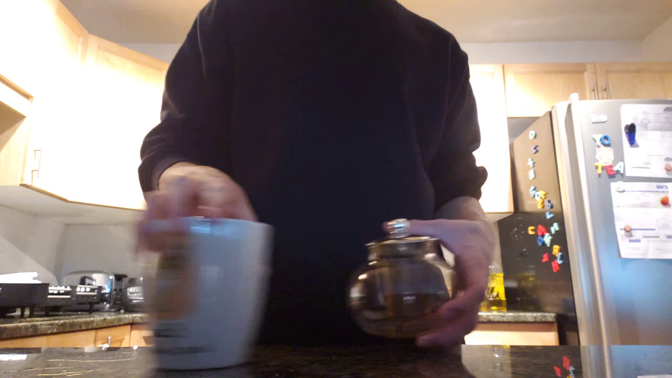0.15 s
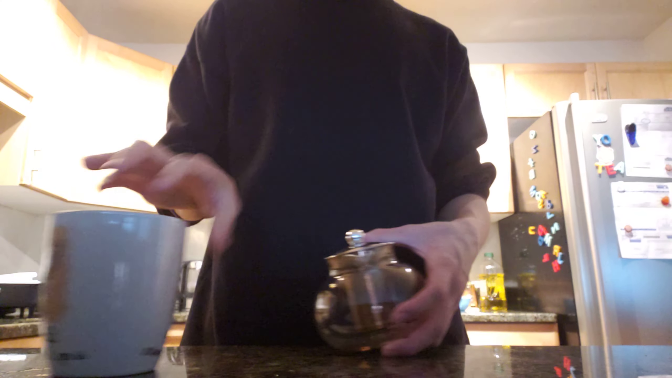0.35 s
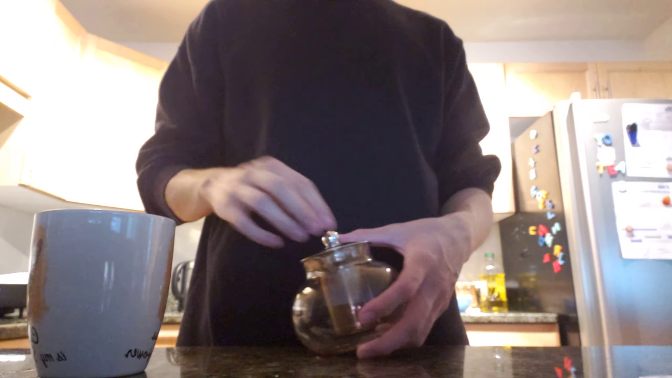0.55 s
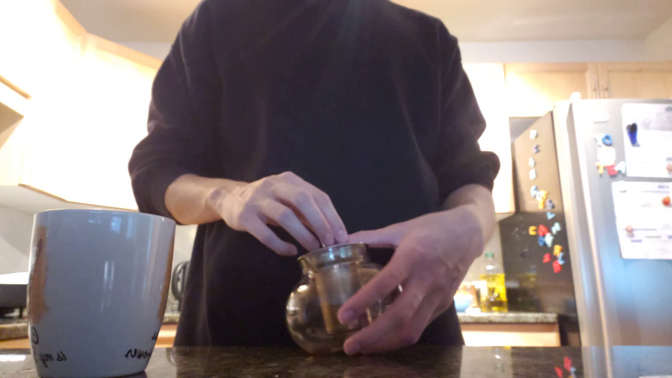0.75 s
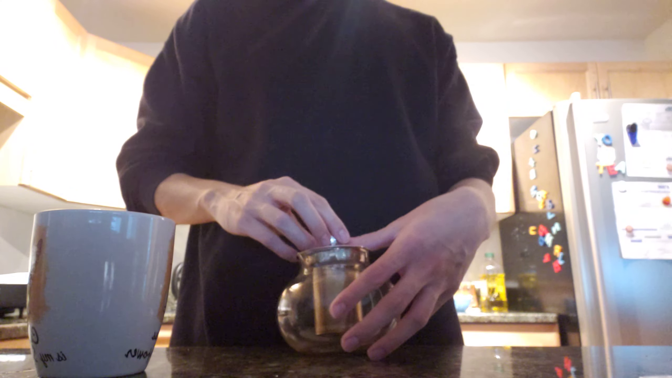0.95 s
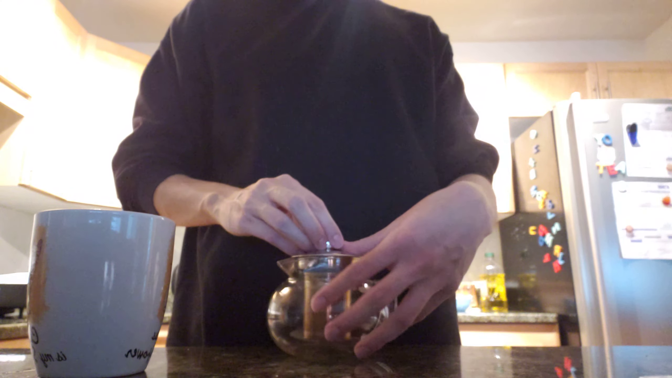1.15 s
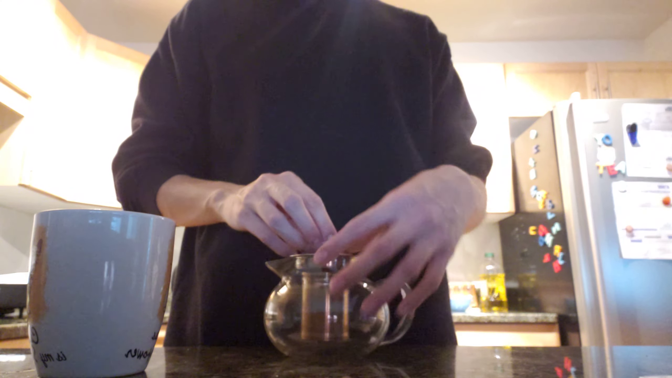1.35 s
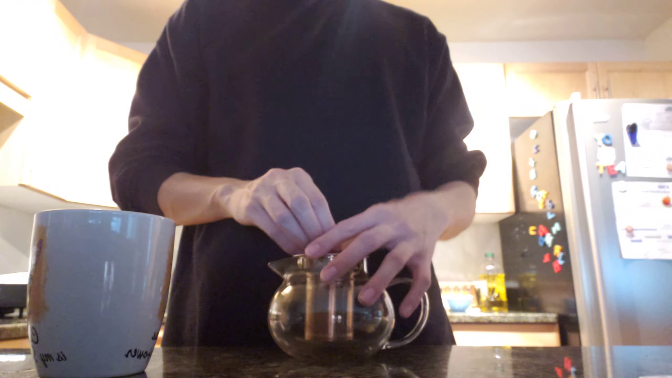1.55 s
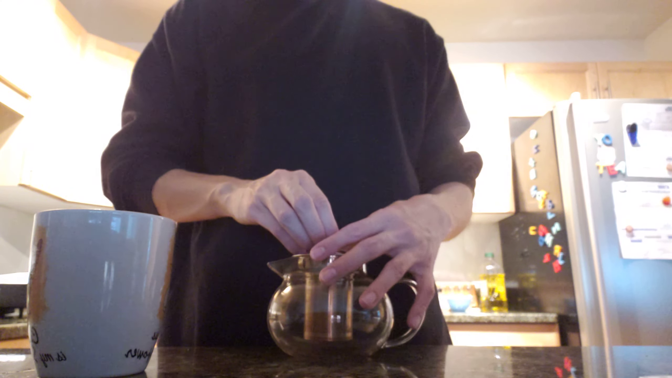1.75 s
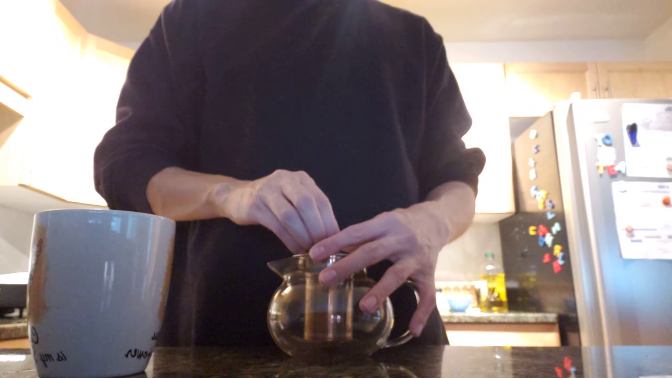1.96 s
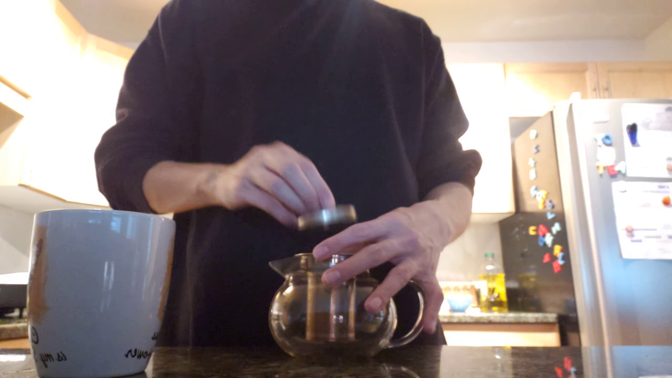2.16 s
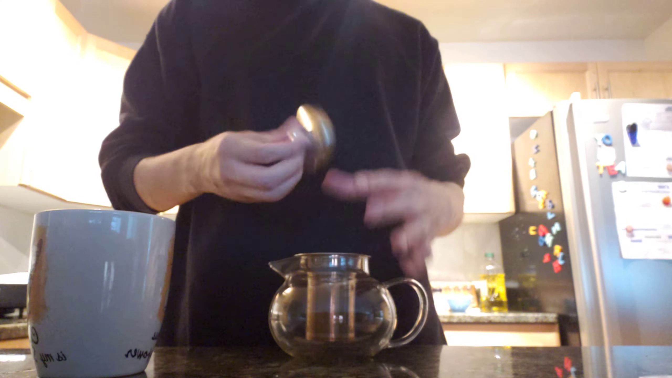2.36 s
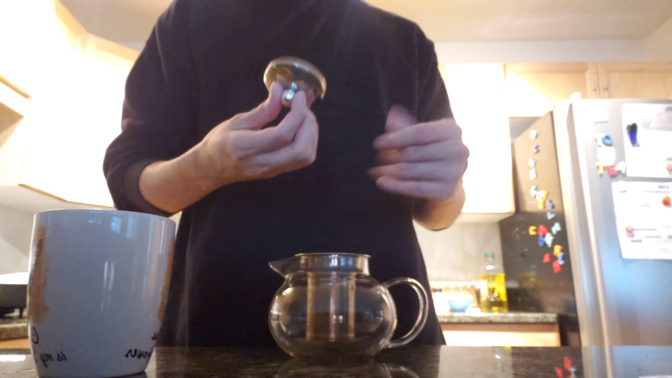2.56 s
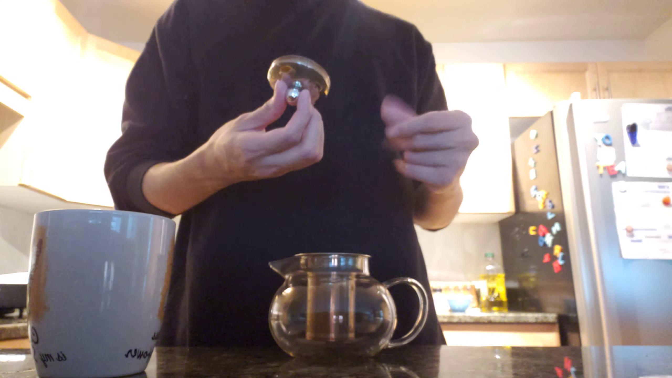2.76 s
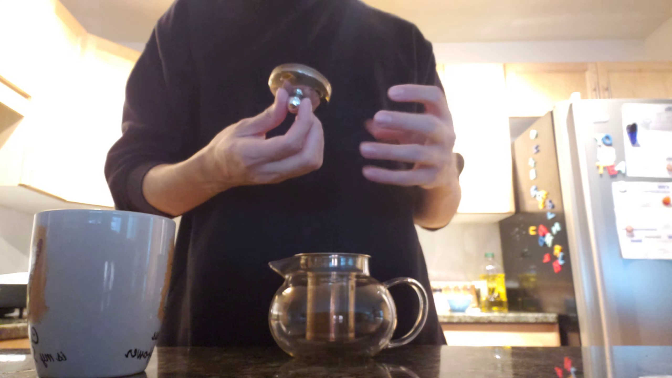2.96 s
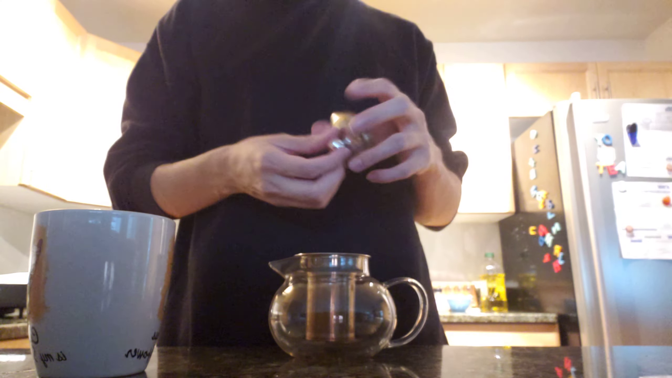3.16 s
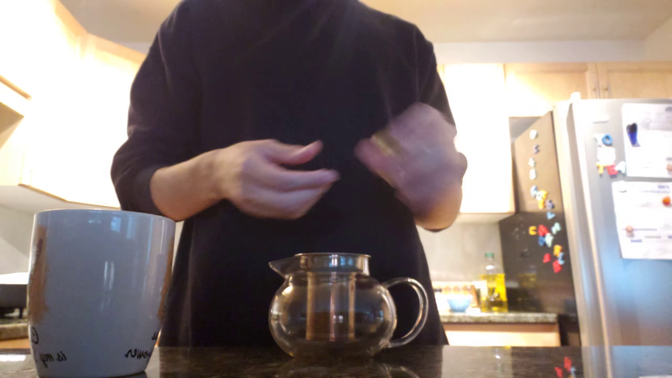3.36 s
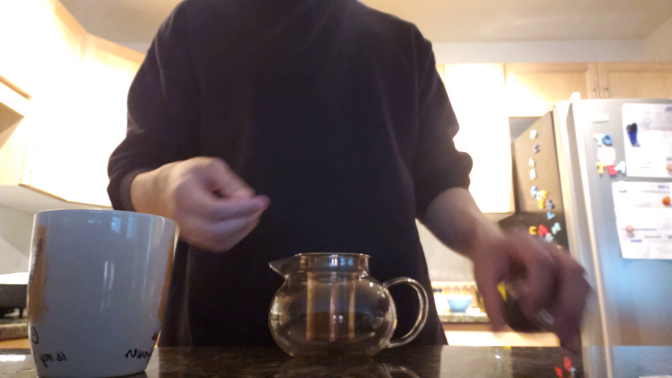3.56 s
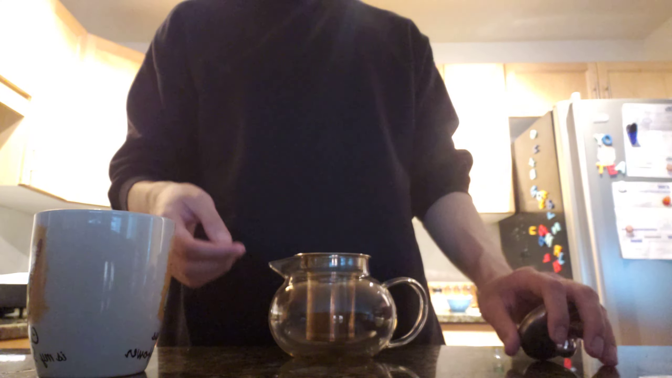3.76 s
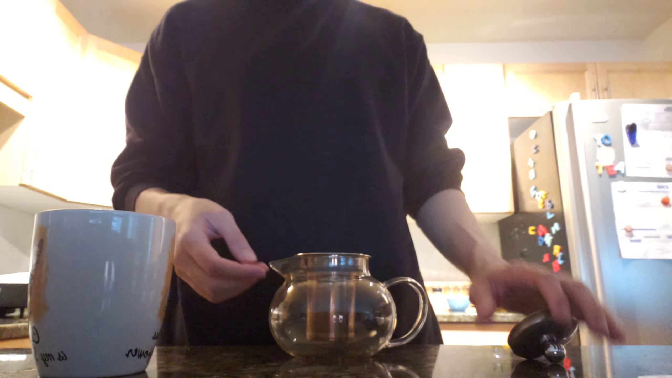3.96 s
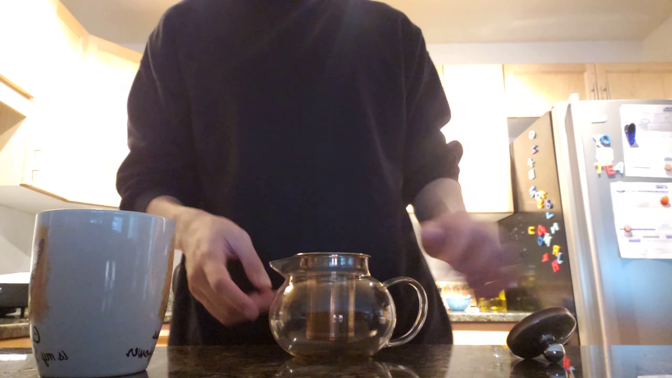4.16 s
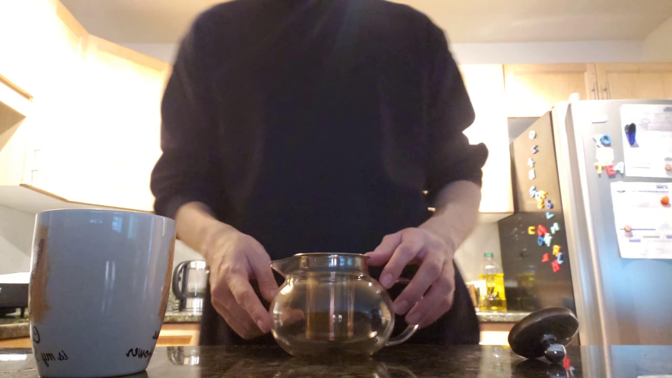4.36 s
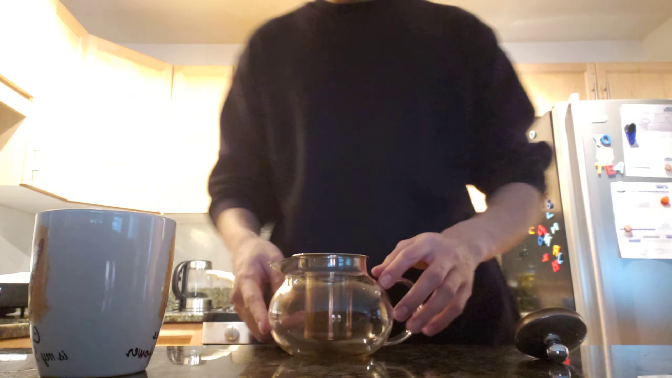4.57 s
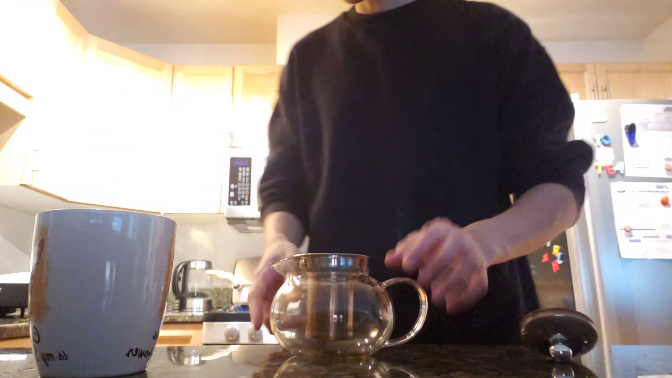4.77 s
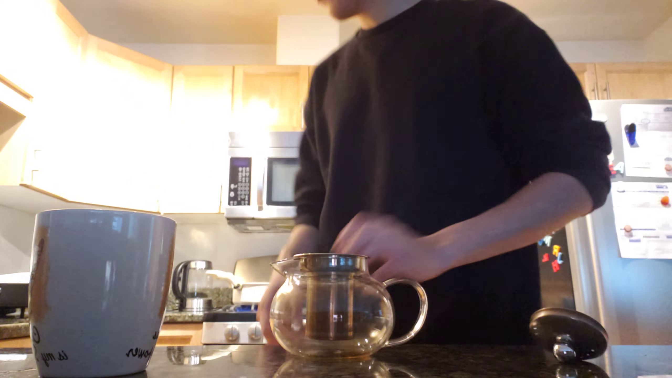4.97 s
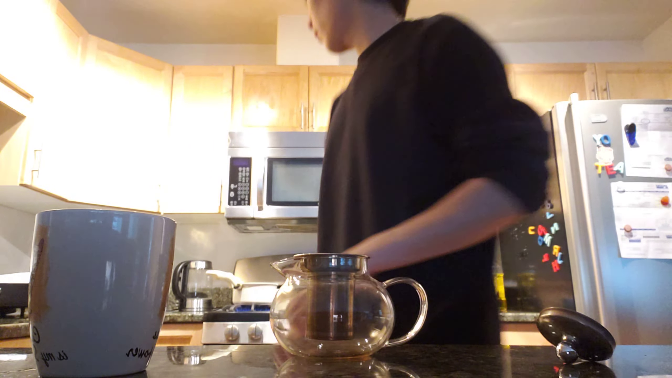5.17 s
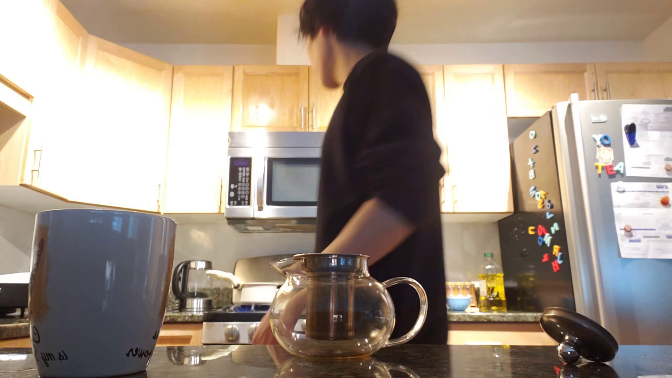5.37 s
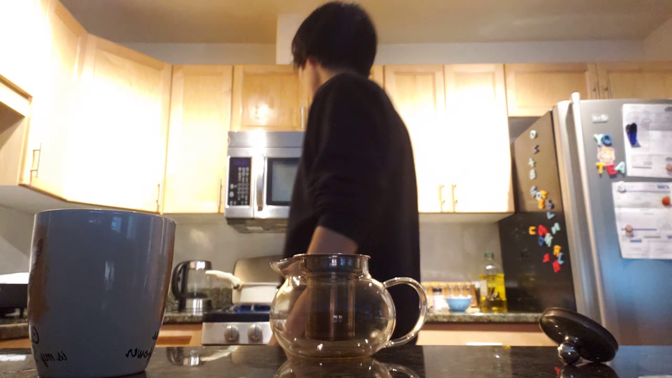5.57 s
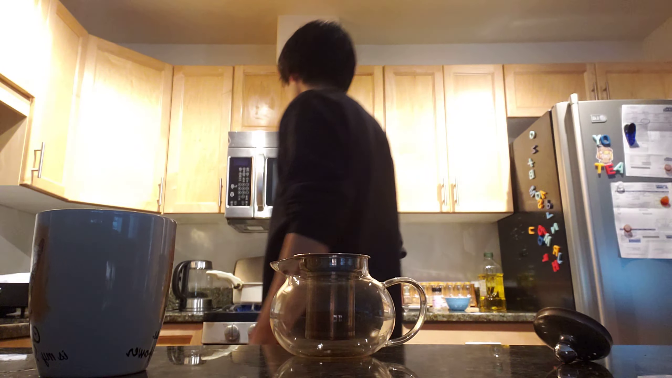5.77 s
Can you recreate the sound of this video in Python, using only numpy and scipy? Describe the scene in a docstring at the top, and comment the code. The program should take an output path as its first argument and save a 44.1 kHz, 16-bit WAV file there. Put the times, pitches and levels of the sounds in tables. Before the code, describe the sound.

A ceramic mug judders across a stone countertop, a glass teapot lands with a hard knock, then its lid clinks and topples down.

```python
"""A ceramic mug judders across a stone countertop: grit and sawtooth slips excite its decaying modes.
A glass teapot touches down on its edge, then lands flat: coloured noise knocks and ringing glass.
Its lid is drawn out in grating catches, turned in the fingers, dropped on the stone, clinks and topples.
Someone steps away with rustling clothes: swells of coloured, grainy noise, with soft bumps.
A small, hard kitchen answers throughout, over a fridge of shaped noise and wavering sines."""
import sys
import numpy as np
from scipy import signal
from scipy.fft import rfft, irfft
from scipy.io import wavfile

SR = 44100
rng = np.random.default_rng(int(sys.argv[2]) if len(sys.argv) > 2 else 0)


def store_wav(level_fs):
    """Save 16-bit WAV to argv[1]."""
    pcm = np.round(np.clip(np.atleast_2d(level_fs), -1, 1) * 32767)
    wavfile.write(sys.argv[1], SR, pcm.T.astype(np.int16))


N = 256662
TIME_S = np.arange(N) / SR
TAIL_S = TIME_S[:2 ** 15]  # time axis of single events and the room response

# Rush of air. Each row: frequency in Hz, density in dB per Hz.
AIR_COLOUR = [(25, -14), (60, -17.5), (100, -15.5), (160, -9.5), (240, -10.5), (360, -8.5), (560, -15),
              (750, -25), (1100, -37), (1600, -37), (2400, -34), (4200, -37.5), (8500, -49), (11500, -37.5),
              (15600, -43)]
AIR_DB = -65
# Fridge hum lines. Each row: frequency in Hz, level in dB.
HUM_LINES = [(161.5, -78), (209.9, -81), (263.8, -78), (355.3, -70.5), (414.5, -75.5), (532.9, -77.5)]

# Kitchen decay. Each row: band centre in Hz, T60 in seconds.
ROOM_DECAY = [(100, .45), (300, .45), (800, .48), (2000, 0.4), (4300, 0.44), (7000, 0.5), (11000, 0.4),
              (15000, 0.3)]
# Likeness of the two channels in diffuse sound. Each row: frequency in Hz, likeness from 0 to 1.
CHANNEL_LIKENESS = [(100, .93), (400, 0.94), (900, 0.37), (1800, .2), (4000, .02)]

# Soft bumps of counter, lid, hands and feet. Each row: start in seconds, level in dB, centre in Hz.
SOFT_BUMPS = [(.705, -52, 130), (1.163, -42.5, 117), (2.053, -47.5, 258), (2.2847, -47.5, 580),
              (4.073, -53.5, 706), (4.243, -55.5, 167), (4.426, -53.5, 180), (4.464, -45.5, 140),
              (4.470, -52.5, 320), (4.575, -59, 222), (5.324, -51, 180.7), (5.373, -54.5, 550)]
BUMP_OCTAVES, BUMP_T60_CYCLES = 0.59, 10  # the deeper the bump, the longer it lasts
# Strokes of skin and cloth. Each row: peak time in seconds, what rubs, level in dB, fall in seconds.
RUB_STROKES = [(0.027, "sleeve", -65.5, 0.068), (2.101, "fingertip", -51.5, 0.0099),
               (2.264, "fingertip", -66, 0.0055), (2.287, "fingertip", -70, 0.009),
               (2.65, "fingertip", -75, .025), (2.746, "fingertip", -74.5, 0.028),
               (2.84, "fingertip", -73.5, 0.027), (2.94, "fingertip", -65, .016),
               (4.252, "sleeve", -51, 0.027), (4.489, "sleeve", -90.5, 0.12), (4.49, "sole", -67.5, 0.15),
               (4.711, "sleeve", -64, 0.032), (5.246, "sleeve", -70, 0.037), (5.345, "sole", -57, .03),
               (5.392, "sole", -57, 0.036), (5.478, "sleeve", -61.5, .022), (5.485, "sole", -58.5, 0.034),
               (5.6, "fingertip", -65.5, 0.031)]
# Colour of each rub, by what rubs. Each row: frequency in Hz, level in dB.
RUB_SPECTRA = {"fingertip": [(1000, -35), (4000, -14.5), (6500, -11.5), (8500, -14), (11000, -0.5),
               (12500, 1.5), (15500, -5.5)], "sleeve": [(300, -5), (900, -3.5), (1600, -9), (2700, -9),
               (3900, 3.5), (5500, -12), (8300, -21.5), (11300, -18.5), (15500, -34.5)],
               "sole": [(100, -8.5), (400, 3), (800, -0.5), (1200, -6.5), (2000, -14), (3600, -10),
               (5300, -37), (15500, -51)]}
RISE_SHARE = .5  # rise time over fall time
# Thin squeaks of rubbed glaze and glass. Each row: peak time in seconds, level in dB, centre in Hz,
# width in octaves, fall in seconds.
RUB_SQUEAKS = [(0.049, -70, 4275, 0.014, 0.021), (.16, -73, 4380, 0.014, 0.03),
               (0.347, -67, 4233, 0.0043, 0.07), (1.12, -71.5, 3750, 0.058, 0.054),
               (2.085, -58, 4030, 0.09, 0.015), (5.251, -65, 4400, 0.074, 0.042)]

# Slab ringing from the two hard landings. Each row: start in seconds, level in dB.
SLAB_LANDINGS = [(1.1465, -21), (3.9113, -25)]
SLAB_MODE_HZ, SLAB_T60_S = 876, .1

# Colour of the lid's catches in the pot's neck. Each row: frequency in Hz, level in dB.
NECK_COLOUR = [(100, -1), (300, 9.5), (900, -2), (1250, -9.5), (2100, 0), (3100, -10), (4100, 2),
               (5500, -14), (8000, -29), (11000, -11), (15500, -13)]
DRAW_START_S, DRAW_FREE_S, CATCH_COUNT = 2.0555, 2.102, 5
CATCH_FIRST_DB, CATCH_LAST_DB = -57.5, -51

# Lid on stone. Each row: start in seconds, knock in dB, tick in dB, ring in dB,
# ring tilt in dB per octave.
LID_CONTACTS = [(3.7733, -55.5, -32.5, -36, 11), (3.9107, -28, -52, -14, -22),
                (3.9180, -27, -56.5, -39, -10), (3.9200, -37, -34.5, -22, 3),
                (3.9228, -33.5, -35.5, -21.5, -4.5), (3.9255, -31.5, -32, -29, 4.5),
                (3.928, -36.5, -42.5, -38, 10), (4.066, -52.5, -73, -68, -1)]
# Lid modes. Each row: frequency in Hz, level in dB, T60 in seconds, left minus right in dB.
LID_RING = [(4180, -9.5, .08, 1), (4264, -0.5, 0.065, -10.5), (4400, -13.5, .05, -5), (4680, -15, .025, -7),
            (5188, -14, 0.011, -8), (10690, -11.5, .04, -2.5), (10720, -1, 0.058, -3.5),
            (10800, -5.5, 0.091, -2), (10744, -9, .05, 0.5), (11350, -11.5, .05, 0), (11500, -9, 0.11, 3),
            (12905, -21, 0.089, 5), (13735, -19, 0.12, 13.5), (14600, -24.5, .05, 10.5)]
# Colours of the stone's knock and the rim's tick. Each row: frequency in Hz, level in dB.
LID_KNOCK_COLOUR = [(60, -21.5), (150, -14.5), (350, -7), (700, -2.5), (800, -5), (875, 9), (970, -2),
                    (1200, -4), (1700, 1.5), (2500, 1.5), (3300, -8.5), (4500, -10), (6500, -21.5),
                    (15000, -41.5)]
LID_TICK_COLOUR = [(300, -22), (1100, -26.5), (2700, -6), (3500, -15.5), (4400, 1.5), (5300, -3.5),
                   (6800, -9.5), (8000, -21.5), (9700, -19), (10800, 1.5), (12300, -9), (14500, -10.5),
                   (15500, -25)]
LID_CHOKE_MIN_S = 0.0058

# Teapot on stone. Each row: start in seconds, part that strikes, knock in dB, ring in dB,
# ring tilt in dB per octave.
POT_CONTACTS = [(.6899, "edge", -33.5, -51.5, -3), (.6976, "edge", -37, -58, -1),
                (0.997, "edge", -72.5, -70.5, 4), (1.142, "base", -41.5, -52.5, -4),
                (1.1445, "base", -29.5, -24.5, -1), (1.148, "base", -29, -23.5, -4.5),
                (1.1511, "base", -27.5, -28.5, 1), (1.1583, "base", -27, -23.5, 2),
                (1.665, "base", -75.5, -61.5, -3.5)]
# Teapot modes. Each row: frequency in Hz, level in dB, T60 in seconds, left minus right in dB.
POT_RING = [(281.6, -7, .09, 2), (372, -14.5, .07, 4.5), (501, -7.5, .1, 1), (576, -6.5, .1, 7),
            (690, -13, .07, 3.5), (880, -3, .05, 0.5), (935, -9.5, .07, 4), (1240, -9.5, .04, 3.5),
            (1720, -12, 0.031, 6.5), (1935, -15.5, .07, 5.5), (2830, -18.5, .05, 8),
            (3654, -14.5, .05, 7.5), (3810, -12.5, 0.04, 7), (3895, -15, .09, 6), (4090, -14, .06, 6),
            (5453, -35, .15, -2), (6400, -34.5, .07, 1.5), (12890, -29.5, .06, 4)]
# Colour of each contact, by part. Each row: frequency in Hz, level in dB.
POT_KNOCK_COLOURS = {"edge": [(40, -34.5), (120, 1), (190, -13), (280, 1), (620, -1.5), (750, -8.5),
                     (920, -2.5), (1150, -11.5), (1950, -6), (2300, -19.5), (3900, -26), (4900, -36),
                     (6100, -26), (7800, -45), (11000, -28), (15500, -40)], "base": [(40, -41.5), (120, -9),
                     (190, -12), (290, -0.5), (600, -3.5), (880, 0), (1150, -7.5), (1800, -12.5),
                     (2300, -21.5), (3900, -14), (4500, -22.5), (7200, -26), (8500, -31.5), (12300, -18.5),
                     (15500, -38.5)]}

# Mug foot catching and slipping. Each row: start in seconds, peak in dB, length in seconds.
MUG_SLIPS = [(0.029, -39.5, 0.014), (0.088, -37, 0.0057), (.127, -28.5, 0.0093), (0.156, -32, 0.0059),
             (0.18, -52, 0.0095), (0.295, -37.5, 0.0047), (0.34, -41, 0.0043)]
# Mug modes. Each row: frequency in Hz, level in dB, T60 in seconds, left minus right in dB.
MUG_RING = [(580, -4.5, 0.028, 3), (695.4, 0, 0.054, 7), (726, -2, 0.03, 4.5), (882, -6, 0.1, 3.5),
            (983, -7, .04, 4), (1100, -11, 0.023, 4), (1666, -19, 0.11, 8), (1810, -16, 0.17, 9),
            (3470, -31.5, .05, 17), (4264, -29.5, .17, 2), (8360, -41, 0.072, 6), (10870, -21, 0.05, -5),
            (11430, -22, 0.1, -5)]
# Hiss of the unglazed foot. Each row: frequency in Hz, level in dB.
MUG_HISS_COLOUR = [(100, -5), (350, 3), (1000, -1), (1400, -8.5), (2400, -39), (3700, -17), (5200, -30.5),
                   (8500, -35), (11000, -20), (15000, -30)]
MUG_SLIP_HZ = 707
MUG_SLIDE_DB, MUG_STOP_S, MUG_BRAKE_S = -54.5, 0.534, 0.2
MUG_SKID_RELATIVE_DB, MUG_SKID_S = -24, 0.013  # skid level is relative to its slip


def undb(db):
    """Decibels to gain."""
    return 10 ** (np.asarray(db) / 20)


def at(points, hz):
    """Read (Hz, value) points on a log-frequency axis."""
    points_hz, value = np.transpose(points)
    return np.interp(np.log(np.maximum(hz, 1)), np.log(points_hz), value)


def freqs(x):
    """The frequencies in Hz of a signal's spectrum."""
    return np.arange(x.shape[-1] // 2 + 1) * SR / x.shape[-1]


def shape(x, gain):
    """Filter by one gain for each frequency."""
    return irfft(rfft(x) * gain, x.shape[-1])


def level(x):
    """Scale to rms 1."""
    return x / np.sqrt(np.mean(x ** 2))


def blow(x):
    """Scale to the energy of 10 ms at rms 1."""
    energy = np.mean(np.sum(x ** 2, axis=-1))
    return x / np.sqrt(energy / (SR / 100))


def pan(left_minus_right_db):
    """Left and right gains for a level difference."""
    return undb(np.array([[left_minus_right_db], [-left_minus_right_db]]) / 2)


def add(out, start_s, x):
    """Mix a sound in; it may already be under way at the start."""
    i = int(start_s * SR)
    x, i = x[..., max(-i, 0):], max(i, 0)
    out[..., i:i + x.shape[-1]] += x[..., :max(N - i, 0)]


def hump(hz, centre_hz, octaves):
    """Level in dB of one broad resonance with falling skirts."""
    distance = np.log2(np.maximum(hz, 1) / centre_hz) / octaves
    return -40 * np.log10(1 + distance ** 2 / 2)


def diffuse(t):
    """Stereo noise from all sides: alike in the bass, unrelated in the treble."""
    mid, side = rng.standard_normal((2, len(t)))
    alike = np.clip(at(CHANNEL_LIKENESS, freqs(t)), 0, 1)
    return shape(mid, np.sqrt(1 + alike)) + shape(side, np.sqrt(1 - alike)) * np.array([[1], [-1]])


def knock(colour_db, t60_s, shudder_db):
    """A sharp push and the dense, short shudder after it, through a causal filter."""
    size = len(TAIL_S)
    # folded cepstrum: minimum phase, so nothing sounds before the push
    cepstrum = irfft(np.log(undb(colour_db)), size)
    cepstrum[1:size // 2] *= 2
    cepstrum[size // 2 + 1:] = 0
    shudder = blow(diffuse(TAIL_S) * undb(-60 * TAIL_S / t60_s))
    push = blow(1. * (TAIL_S == 0))
    return blow(shape(shudder * undb(shudder_db) + push, np.exp(rfft(cepstrum))))


def ring(modes, tilt_db_per_octave=0, wobble_hz=0):
    """Decaying modes, tilted about the strongest; rocking on the stone wobbles their pitch."""
    out = 0
    pivot_hz = max(modes, key=lambda mode: mode[1])[0]
    knots_s = np.linspace(0, TAIL_S[-1], num=150)
    for k, (hz, db, t60_s, side_db) in enumerate(modes):
        rocking_hz = wobble_hz * np.interp(TAIL_S, knots_s, rng.standard_normal(size=150))
        turns = np.cumsum(hz + rocking_hz) / SR
        strength = undb(db + tilt_db_per_octave * np.log2(hz / pivot_hz))
        swing = (-1) ** k * np.sin(2 * np.pi * turns)  # neighbouring modes start in opposite directions
        out = out + strength * pan(side_db) * np.exp(-np.log(1000) * TAIL_S / t60_s) * swing
    return out


def rub(colour_db, fall_s, grain_db):
    """A grainy swell of friction: Gaussian rise to the middle, exponential fall."""
    t = TAIL_S - TAIL_S[-1] / 2
    grain = np.repeat(rng.standard_normal(len(TAIL_S)), 32)[:len(TAIL_S)]  # 32 samples each
    grains = diffuse(TAIL_S) * undb(grain_db * grain)
    swell = np.exp(-np.where(t < 0, (t / (RISE_SHARE * fall_s)) ** 2, t / fall_s))
    return swell * level(shape(grains, undb(colour_db)))


def fridge(waver=.35, pan_db=4):
    """Steady rush of air and hum lines that waver slowly in level and phase."""
    air = level(shape(diffuse(TIME_S), undb(at(AIR_COLOUR, freqs(TIME_S))))) * undb(AIR_DB)
    knots_s = np.linspace(0, TIME_S[-1], 40)
    hum = 0
    for hz, db in HUM_LINES:
        size, phase = (np.interp(TIME_S, knots_s, w) for w in rng.standard_normal(size=(2, 40)))
        tone = np.sin(2 * np.pi * hz * TIME_S + 2 * waver * phase)
        hum = hum + undb(db) * np.sqrt(2) * (1 + waver * size) * tone
    return (air + hum) * pan(pan_db)


def kitchen(near_db, near_t60_s, ceiling_db, ceiling_s, onset_s):
    """Room response: a ceiling echo, quick scatter from the cupboards, a tail fading band by band."""
    noise, hz = diffuse(TAIL_S), freqs(TAIL_S)
    tail = 0
    for k, (_, t60_s) in enumerate(ROOM_DECAY):
        band = at([(f, j == k) for j, (f, _) in enumerate(ROOM_DECAY)], hz)
        tail = tail + shape(noise, band) * np.exp(-np.log(1000) * TAIL_S / t60_s)
    scatter = diffuse(TAIL_S) * np.exp(-np.log(1000) * TAIL_S / near_t60_s)
    response = (tail + undb(near_db) * scatter) * (1 - np.exp(-(TAIL_S / onset_s) ** 2))
    response /= np.sqrt(np.sum(response ** 2) / 2)
    add(response, ceiling_s, undb(ceiling_db) * np.ones((2, 1)))
    return response


def place(x, room, wet_db, left_lag_ms, room_pan_db):
    """Direct sound, reaching the left later than the right by left_lag_ms, plus the room's answer."""
    # half the lag on each side
    lag = np.exp(-2j * np.pi * freqs(x) * np.array([[left_lag_ms], [-left_lag_ms]]) / 2000)
    echo = signal.fftconvolve(x.mean(axis=0)[None], room, axes=1)[:, :N]
    return shape(x, lag) + undb(wet_db) * pan(room_pan_db) * echo


def handling(grain_db=4, squeak_grain_db=3, bump_shudder_db=4, pan_db=4):
    """Dull bumps, short grainy strokes of skin, cloth and soles, and thin squeaks."""
    out, hz, half_s = np.zeros((2, N)), freqs(TAIL_S), TAIL_S[-1] / 2
    for start_s, db, centre_hz in SOFT_BUMPS:
        colour_db = hump(hz, centre_hz, BUMP_OCTAVES)
        add(out, start_s, undb(db) * knock(colour_db, BUMP_T60_CYCLES / centre_hz, bump_shudder_db))
    for peak_s, what, db, fall_s in RUB_STROKES:
        add(out, peak_s - half_s, undb(db) * rub(at(RUB_SPECTRA[what], hz), fall_s, grain_db))
    for peak_s, db, centre_hz, octaves, fall_s in RUB_SQUEAKS:
        squeak = rub(hump(hz, centre_hz, octaves), fall_s, squeak_grain_db)
        add(out, peak_s - half_s, undb(db) * squeak)
    return out * pan(pan_db)


def slab(pan_db=1.5):
    """The countertop's one strong mode, rung by the hard landings."""
    out = np.zeros((2, N))
    for start_s, db in SLAB_LANDINGS:
        add(out, start_s, ring([(SLAB_MODE_HZ, db, SLAB_T60_S, pan_db)]))
    return out


def neck(catch_t60_s=0.03, catch_shudder_db=2, scatter_s=.002, uneven_db=3.0, pan_db=4):
    """The lid grates out of the pot's neck in quick, uneven catches, on average ever harder."""
    out = np.zeros((2, N))
    late, harder = rng.standard_normal((CATCH_COUNT, 2)).T
    starts_s = np.linspace(DRAW_START_S, DRAW_FREE_S, CATCH_COUNT) + scatter_s * late
    levels_db = np.linspace(CATCH_FIRST_DB, CATCH_LAST_DB, CATCH_COUNT) + uneven_db * harder
    for start_s, db in zip(starts_s, levels_db):
        add(out, start_s, undb(db) * knock(at(NECK_COLOUR, freqs(TAIL_S)), catch_t60_s, catch_shudder_db))
    return out * pan(pan_db)


def lid(knock_t60_s=0.036, knock_shudder_db=-3, tick_t60_s=0.024, tick_shudder_db=13,
        knock_pan_db=2, tick_pan_db=-3):
    """The rim clinks, the lid topples onto its knob and chatters to rest."""
    out, hz = np.zeros((2, N)), freqs(TAIL_S)
    gaps_s = np.diff([row[0] for row in LID_CONTACTS], append=np.inf)
    for (start_s, knock_db, tick_db, ring_db, tilt_db), gap_s in zip(LID_CONTACTS, gaps_s):
        stone = knock(at(LID_KNOCK_COLOUR, hz), knock_t60_s, knock_shudder_db)
        rim = knock(at(LID_TICK_COLOUR, hz), tick_t60_s, tick_shudder_db)
        # the next contact chokes the ring, but no sooner than LID_CHOKE_MIN_S
        free = 1 / (1 + (TAIL_S / max(gap_s, LID_CHOKE_MIN_S)) ** 8)
        add(out, start_s, undb(knock_db) * pan(knock_pan_db) * stone)
        add(out, start_s, undb(tick_db) * pan(tick_pan_db) * rim)
        add(out, start_s, undb(ring_db) * ring(LID_RING, tilt_db, wobble_hz=28) * free)
    return out


def teapot(knock_t60_s=.035, shudder_db=0, pan_db=5.5):
    """Each contact knocks the stone and rings the glass, which the hand keeps short."""
    out = np.zeros((2, N))
    for start_s, part, knock_db, ring_db, tilt_db in POT_CONTACTS:
        stone = knock(at(POT_KNOCK_COLOURS[part], freqs(TAIL_S)), knock_t60_s, shudder_db)
        add(out, start_s, undb(knock_db) * pan(pan_db) * stone)
        add(out, start_s, undb(ring_db) * ring(POT_RING, tilt_db, wobble_hz=22))
    return out


def mug_friction_level():
    """Friction follows the mug's speed, even and then braking; it flares at each slip's start, then fades."""
    speed = np.clip((MUG_STOP_S - TIME_S) / MUG_BRAKE_S, 0, 1)
    skids = 0
    for start_s, db, _ in MUG_SLIPS:
        fade = np.exp(-np.abs(TIME_S - start_s) / MUG_SKID_S)
        skids = skids + undb(db + MUG_SKID_RELATIVE_DB) * (TIME_S > start_s) * fade
    return speed * (undb(MUG_SLIDE_DB) + skids)


def mug(grit_db=4, glide=.06, hiss_db=-9):
    """Grit excites the sliding mug; where its foot catches, sawtooth slips run near its strongest mode."""
    body = ring(MUG_RING)
    grit = rng.standard_normal(N) * undb(grit_db * rng.standard_normal(N))
    slide = level(signal.fftconvolve(grit[None], body, axes=1)[:, :N])
    hiss = level(shape(diffuse(TIME_S), undb(at(MUG_HISS_COLOUR, freqs(TIME_S))))) * pan(5.9)
    out = (slide + undb(hiss_db) * hiss) * mug_friction_level()
    for start_s, peak_db, length_s in MUG_SLIPS:
        t = TAIL_S[:int(length_s * SR)]
        slip_hz = MUG_SLIP_HZ * (1 + glide * rng.standard_normal() * (t / length_s - .5))
        turns = np.cumsum(slip_hz) / SR
        slips = (turns % 1 - .5) * np.sin(np.pi * t / length_s)  # the force builds and lets go
        judder = signal.fftconvolve(slips[None], body, axes=1)
        add(out, start_s, undb(peak_db) * judder / np.abs(judder.mean(axis=0)).max())
    return out


def scene():
    """By arrival time: mug left, teapot near the middle, lid right; slab and fridge bypass the room."""
    room = kitchen(near_db=3.5, near_t60_s=.13, ceiling_db=-11.0, ceiling_s=.0075, onset_s=0.0093)
    return (fridge() + slab()
            + place(handling() + neck(), room, wet_db=-1.5, left_lag_ms=-.03, room_pan_db=5.5)
            + place(lid(), room, wet_db=-7.5, left_lag_ms=0.11, room_pan_db=3.0)
            + place(teapot(), room, wet_db=-4.5, left_lag_ms=-0.024, room_pan_db=4.0)
            + place(mug(), room, wet_db=-10.0, left_lag_ms=-.12, room_pan_db=5.5))


def record(dry, low_cut_hz=55, top_hz=15750):
    """Trim the deep bass gently and cut the top steeply."""
    low_cut = signal.butter(2, low_cut_hz, "high", fs=SR, output="sos")
    top_cut = signal.ellip(10, .1, 70, top_hz, fs=SR, output="sos")  # 0.1 dB ripple, 70 dB stop
    return signal.sosfilt(top_cut, signal.sosfilt(low_cut, dry))


dry = scene()
out = record(dry)
store_wav(out)
```